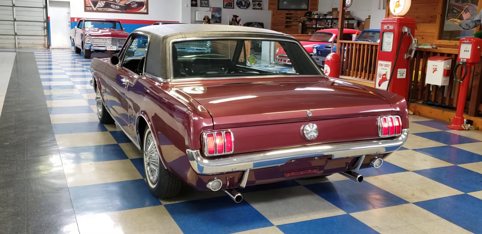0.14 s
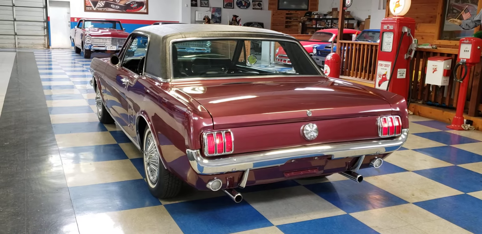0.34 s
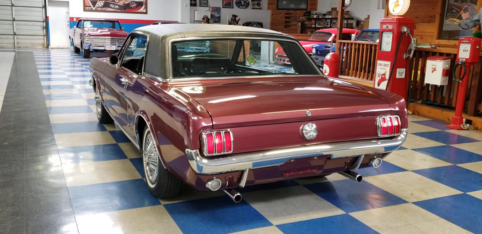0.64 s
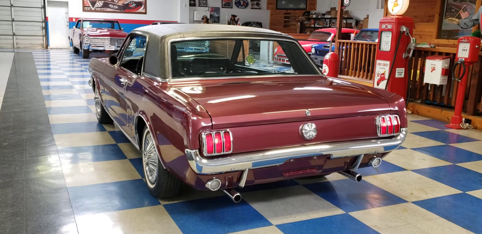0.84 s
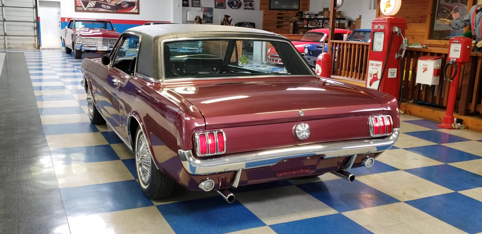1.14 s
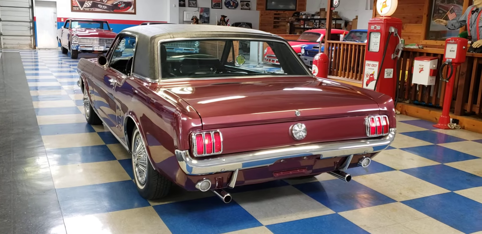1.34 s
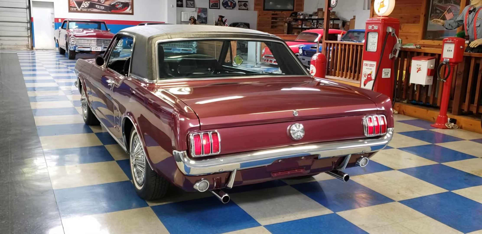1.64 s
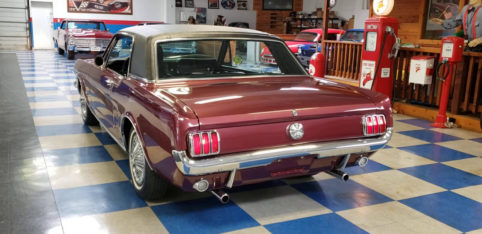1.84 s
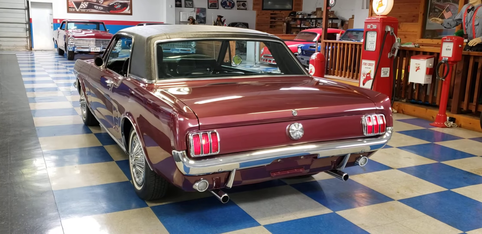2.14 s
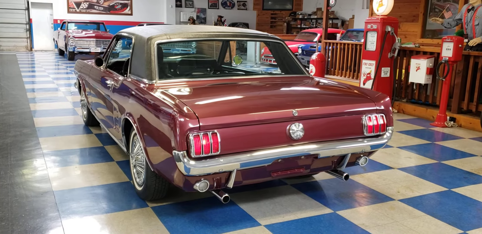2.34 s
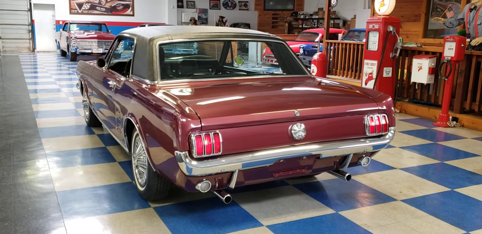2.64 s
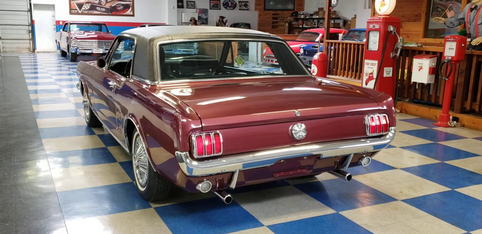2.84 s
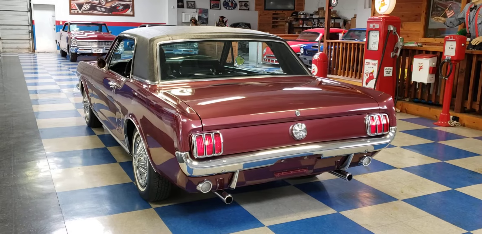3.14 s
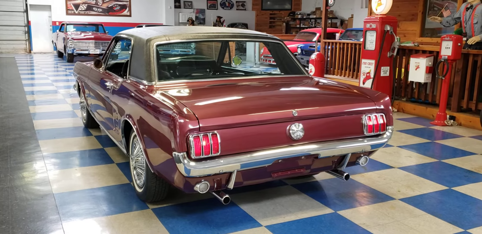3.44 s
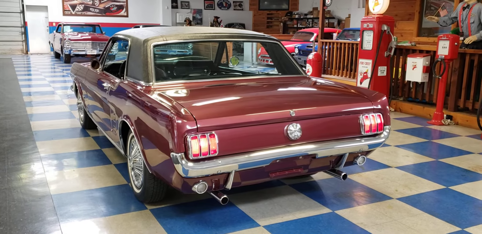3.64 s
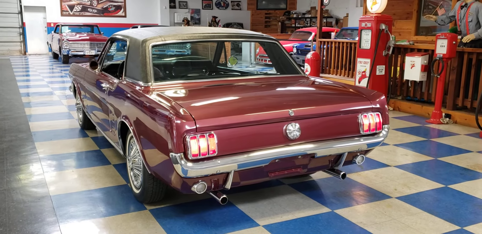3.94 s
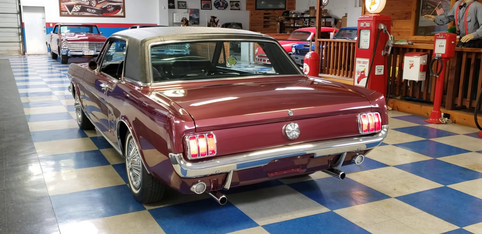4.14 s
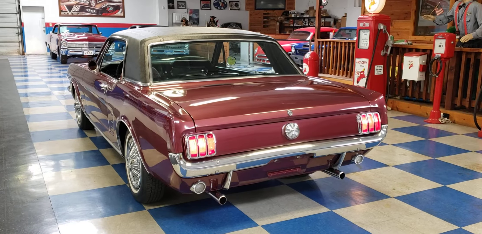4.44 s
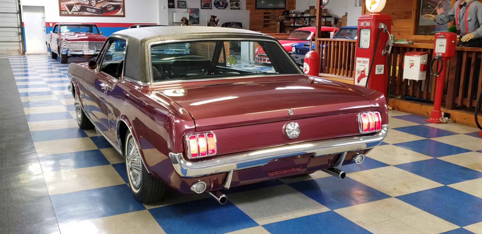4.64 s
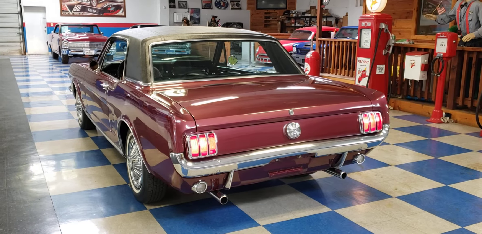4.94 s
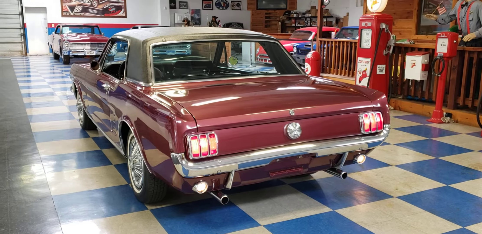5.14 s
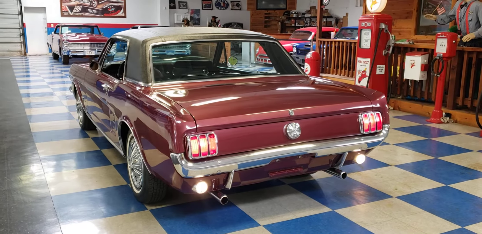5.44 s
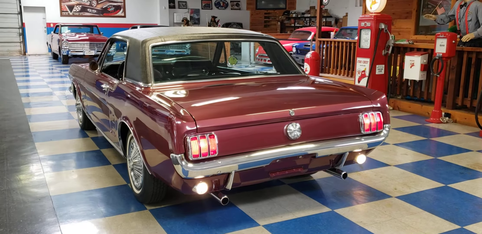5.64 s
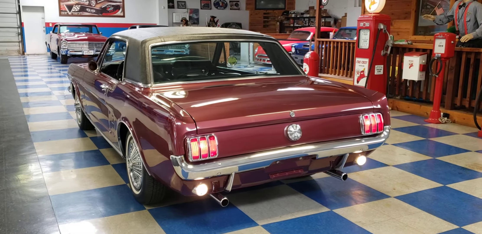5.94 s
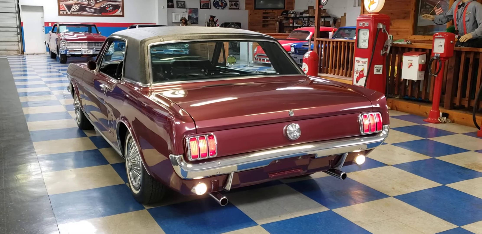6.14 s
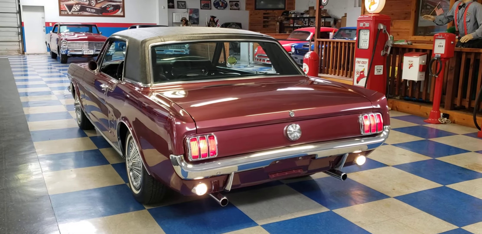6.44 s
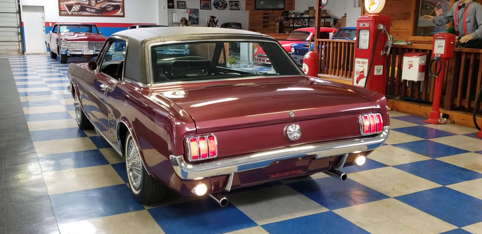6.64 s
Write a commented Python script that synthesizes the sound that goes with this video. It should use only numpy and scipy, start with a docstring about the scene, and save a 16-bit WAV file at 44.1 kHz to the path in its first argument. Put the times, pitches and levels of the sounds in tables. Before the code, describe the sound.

Uneven, deep V8 exhaust idle in a reverberant hall, two quick throttle blips, faint belt squeaks, brake hiss, and a metallic gear clack.

```python
"""The exhaust of an old V8 with twin tailpipes idles in a large tiled showroom, a few metres away.
Uneven firings ring pipes and muffler and blow noisy puffs; loose sheet metal chatters along.
Two blips of the throttle spin up the crankshaft, and the belt-driven fan, a band of noise, roars with it.
A belt squeaks faintly as a fluttering tone; with the brake held, a valve hisses as filtered noise.
Then a gear engages with a clack of short noise bursts, and its load drags the idle down."""
import sys
import numpy as np
from scipy import signal
from scipy.fft import rfft, irfft, next_fast_len
from scipy.io import wavfile

SR = 44100
rng = np.random.default_rng(int(sys.argv[2]) if len(sys.argv) > 2 else 0)


def transcribe(signal):
    """Save signal, clipped to [-1, 1], as a 16-bit WAV file at the path in sys.argv[1]."""
    frames = np.atleast_2d(signal).T
    limited = np.clip(frames, -1, 1)
    pcm = np.round(limited * 32767).astype(np.int16)
    wavfile.write(sys.argv[1], SR, pcm)


N = 299880
TIME = np.arange(N) / SR
SIZE = next_fast_len(N + 2 * SR)
FREQS = np.arange(SIZE // 2 + 1) * SR / SIZE + 1e-3  # the offset keeps the logarithm finite


def undb(db):
    """Amplitude gain is 10 to the power of the level in decibels over 20."""
    return 10 ** (np.asarray(db) / 20)


def unit(x):
    """Normalization: divide by the root mean square, so that it becomes 1."""
    return x / np.sqrt(np.mean(x ** 2))


def curves(rows):
    """Linear interpolation of each column of a timed table, at every sample."""
    s, *columns = np.transpose(rows)
    return [np.interp(TIME, s, c) for c in columns]


def ramp(start, length):
    """Linear onset: rise from 0 to 1 and stay there."""
    return np.clip((TIME - start) / length, 0, 1)


def shape(points):
    """Spectral envelope: levels interpolated over the logarithm of frequency, at every bin."""
    hz, db = np.transpose(points)
    return np.interp(np.log(FREQS), np.log(hz), db)


def colour(x, db):
    """Minimum-phase filter: folding the cepstrum gives a causal response with the gain of every bin."""
    cepstrum = irfft(np.log(undb(db)), SIZE)
    cepstrum[1:SIZE // 2] *= 2
    cepstrum[SIZE // 2 + 1:] = 0
    return irfft(rfft(x, SIZE) * np.exp(rfft(cepstrum)), SIZE)[..., :N]


def butter(x, hz, kind, order=2):
    """Butterworth low-, high- or band-pass: a maximally flat pass band."""
    sos = signal.butter(order, np.minimum(hz, .45 * SR), kind, fs=SR, output="sos")
    return signal.sosfilt(sos, x)


def walk(rate_hz):
    """Random fluctuation: white noise below a cutoff rate, with rms 1."""
    return unit(butter(rng.standard_normal(N), rate_hz, "low"))


def pan(db):
    """Level difference between the ears: gains of two channels for a left minus right level."""
    return undb(np.array([[db], [-db]]) / 2)


def aside(pair, points):
    """Frequency-dependent level difference: tilt each band of a stereo pair to its own side."""
    tilt_db = shape(points) / 2
    return np.array([colour(pair[0], tilt_db), colour(pair[1], -tilt_db)])


def showroom(x, wet_db):
    """Reverberation: direct sound plus an exponential tail, different at each ear; the treble dies first."""
    t60_s, treble_t60_s = 1.34, 1
    t = TIME[:SR]
    noise = rng.standard_normal((2, SR))
    low = butter(noise, 3100, "low", order=1)
    tail = low * undb(-60 * t / t60_s) + (noise - low) * undb(-60 * t / treble_t60_s)
    tail *= 1 - np.exp(-t / 0.002)
    tail *= undb(wet_db) / np.sqrt(np.sum(tail ** 2) / 2)
    wet = signal.fftconvolve(x[None], tail)[:, :N]
    return (x + wet) / np.sqrt(1 + undb(2 * wet_db))  # keeps the power


def crankshaft():
    """Rotational inertia: throttle drives a flywheel that friction runs down; gives firing rate and effort."""
    # idle with the throttle shut, dragged down by the gear: time_s, firing_rate_hz
    idle = [(0, 56.03), (.5, 54.97), (.85, 58.33), (2.0, 62.46), (3.6, 61.18), (4.25, 58.23), (4.85, 63.15),
            (5.3, 60.68), (5.57, 57), (5.69, 47.61), (5.92, 41.2), (6.15, 46.07), (6.4, 43.88),
            (6.8, 45.88)]
    # blips of the throttle: press_s, release_s, opening (0-1)
    blips = [(1.123, 1.384, .845), (2.053, 2.292, 0.96)]
    press_s, release_s = .13, .05  # travel times of the throttle
    push_hz_per_s, flywheel_s = 480, .5  # drive at full throttle; time constant of running down
    overrun_hz = 4.5  # scale above idle at which coasting sets in, with the throttle shut

    throttle = sum(opening * (ramp(press, press_s) - ramp(release, release_s))
                   for press, release, opening in blips)
    keep = np.exp(-1 / (flywheel_s * SR))
    revs = signal.lfilter([push_hz_per_s / SR], [1, -keep], throttle)
    coasting = np.tanh(revs / overrun_hz) * (1 - throttle)
    return curves(idle)[0] + revs, np.array([throttle, revs, coasting])


def drone(hz, firings, throttle):
    """Harmonic series: the even part of the firings; its overtones swell as they cross a resonance."""
    # the pipes favour some speeds: firing_rate_hz, firing_tone_db (throttle shut)
    tone = [(42, -26), (45, -23.5), (55, -26), (63, -26.5), (75, -34), (85, -31.5), (104, -27.5),
            (114, -23.5), (150, -20.5)]
    # octave of the firing tone: firing_rate_hz, level_db
    octave = [(41, -45), (46, -28.5), (51, -44), (55, -32), (58, -26), (63, -23.5), (70, -31.5),
              (79, -38.5), (95, -30.5), (112, -31), (150, -42)]
    # higher multiples of the firing rate: multiple, level_db (before the resonance gain)
    overtones = [(3, -37), (4, -30.5), (6, -36.5)]
    # resonances of the exhaust system: centre_hz, width_hz, gain_db
    booms = [(133.5, 13, -2), (184.5, 17.4, -1.5), (265.7, 12, -10.5), (493, 40, -24)]
    throttle_db = 6  # growth of the firing tone at full throttle

    tone_db = np.interp(hz, *np.transpose(tone)) + throttle_db * throttle
    octave_db = np.interp(hz, *np.transpose(octave))
    angle = 2 * np.pi * firings
    out = undb(tone_db + walk(12)) * np.sin(angle)
    out = out + undb(octave_db + walk(12)) * np.sin(2 * angle)
    for k, db in overtones:
        boom = sum(undb(gain_db) / (1 + 2j * (k * hz - centre) / width) for centre, width, gain_db in booms)
        out = out + undb(db + 2 * walk(7.6)) * np.imag(boom * np.exp(1j * k * angle))
    return np.sqrt(2) * out


def burble(pulses, effort, idle_db, chamber_hz=130, chamber_width_hz=240):
    """Impulse response and dispersion: uneven pulses ring the pipes; muffler chambers spread them in time."""
    # response of the pipes: frequency_hz, gain_db (relative)
    pipes = [(25, -73), (36, -11.5), (45, 3), (60, -3.5), (85, 3), (108, 3.5), (135, -0.5), (165, -5.5),
             (190, 2), (250, -11.5), (278, -2), (310, -24.5), (450, -32), (3000, -110)]
    # level against effort: full_throttle_db, db_per_hz above idle, coasting_db
    burble_law = (3, .07, .5)
    # crispness against effort: full_throttle_db, db_per_hz above idle, coasting_db
    crisp_law = (5.7, -0.087, 11.4)

    crisp_db = -1 + np.dot(crisp_law, effort)  # -1 dB at idle
    pole = np.exp((2j * chamber_hz - chamber_width_hz) * np.pi / SR)
    chamber = np.poly([pole, pole.conjugate()]).real
    spread = signal.lfilter(chamber[::-1], chamber, colour(pulses, shape(pipes)))  # all-pass
    ring = showroom(spread, -10)[0]
    # low-pass forwards and backwards, so that the low part keeps its phase
    low = butter(butter(ring, 160, "low")[::-1], 160, "low")[::-1]
    mix = (low + undb(crisp_db) * (ring - low)) / np.sqrt(1 + 0.68 * undb(2 * crisp_db))
    lumps = unit(mix) * undb(idle_db + np.dot(burble_law, effort))
    return showroom(lumps, -18.5)


def woofs(hz=52, length=0.036):
    """Tone burst: a late burn in the pipes, just after the throttle shuts, gives two or three slow cycles."""
    # bursts: centre_s, level_db
    bursts = [(1.455, -15.5), (1.57, -25), (2.524, -26)]
    out = 0
    for s, db in bursts:
        age = TIME - s
        out = out + undb(db) * np.exp(-(age / length) ** 2) * np.sin(2 * np.pi * hz * age)
    return out


def stumbles(length=0.017):
    """Amplitude modulation: weak firings leave short gaps in the exhaust note; this is its gain."""
    # gaps: centre_s, depth_db
    gaps = [(0.223, -8), (.32, -11), (.485, -5), (1.645, -7), (1.895, -3.5), (3.04, -3), (4.2, -11.5),
            (5.23, -1)]
    return undb(sum(db * np.exp(-((TIME - s) / length) ** 2) for s, db in gaps))


def gas(firings, excess, pulses, effort, idle_rasp_db, bank_db=1.9):
    """Turbulent jet noise: each firing rings the muffler and blows a puff of gas out of the tailpipe."""
    # responses of muffler and tailpipe: frequency_hz, gain_db (relative)
    muffler = [(150, -26.5), (300, 1.5), (355, 0.5), (410, -3.5), (478, 3), (550, -4), (650, -3),
               (770, -24.5), (1200, -27), (5000, -57)]
    tailpipe = [(400, -22.5), (780, -7.5), (1050, 5.5), (1260, -10), (1480, 0.5), (1850, -5.5), (2400, -8),
                (3800, -9), (4700, -9), (6200, -16), (7600, -34), (10000, -27), (12500, -21.5),
                (15500, -21.5)]
    # side on which each band of the puff is heard: frequency_hz, left_minus_right_db
    tailpipe_pan = [(1200, 3), (2500, 10), (4000, 4), (5000, -3), (6000, -9), (10000, -10), (15000, -2)]
    # rasp and puff against effort: full_throttle_db, db_per_hz above idle, coasting_db
    rasp_law = (4.6, 0.11, -1.2)
    puff_law = (7.6, .14, -7)

    rasp_db = idle_rasp_db + np.dot(rasp_law, effort)
    puff_db = -47 + np.dot(puff_law, effort)  # -47 dB at idle
    # the flow leaps at each firing and dies away before the next
    gate = unit(.3 + undb(bank_db * excess) * np.exp(-(firings % 1) / .4))
    rasp_source = gate * rng.standard_normal(N) + unit(pulses)
    rasp = unit(colour(rasp_source, shape(muffler))) * undb(rasp_db)
    puff = unit(colour(gate * rng.standard_normal(N), shape(tailpipe))) * undb(puff_db)
    rasp_pair = showroom(showroom(rasp, -2.5)[0], -16.5) * pan(2.4)
    return rasp_pair + aside(showroom(puff, 1.1), tailpipe_pan)


def exhaust(hz, effort, firings, count):
    """Superposition of even and uneven firings; the bass reaches both ears nearly alike."""
    # unevenness of the burn: time_s, burble_db (at idle), scatter (share of a firing), rasp_db (at idle)
    lumpy = [(0, -26.5, 0.57, -42), (.4, -26.5, 0.66, -45.5), (1.1, -27.5, 0.63, -41.5),
             (1.6, -27, 0.55, -43), (2.3, -29.5, 0.69, -43), (3.4, -28, .45, -41), (3.95, -32.5, 0.52, -42),
             (5.0, -31, 0.51, -40), (5.6, -27, .5, -39.5), (5.9, -37, 0.54, -49), (6.15, -32, 0.41, -43),
             (6.8, -35, 0.42, -46.5)]
    # in firing order: excess (of each cylinder's pulse over the mean; the sign tells its bank)
    cylinders = [0.68, -1.1, 0.57, 0.79, -0.34, 0.52, -0.55, -0.78]

    burble_db, scatter, rasp_db = curves(lumpy)
    # the banks fire out of step, so each pulse is over or under the mean
    chance = rng.standard_normal(N)[count]  # one draw for each firing
    excess = np.array(cylinders)[count % len(cylinders)] + scatter * chance
    pulses = np.diff(count, prepend=0) * excess / np.sqrt(hz)
    note = drone(hz, firings, effort[0]) + burble(pulses, effort, burble_db) + woofs()
    return note * stumbles() * pan(1.3) + gas(firings, excess, pulses, effort, rasp_db)


def chatter(count, hz, effort, scatter_db=3, bout_db=6.5):
    """Impact excitation of modes: firings jolt loose sheet metal in bouts; slow ones jolt hardest."""
    # modes of the sheet metal on the exhaust: centre_hz, width_hz, gain_db
    shield = [(1052, 103, -9), (1468, 138, 3.5), (1574, 55, 5.5), (1700, 36, -1.5)]
    # chatter against effort: full_throttle_db, db_per_hz above idle, coasting_db
    chatter_law = (10.3, 0.12, -7)

    level_db = -52 + np.dot(chatter_law, effort)  # -52 dB at idle
    jolt_db = scatter_db * rng.uniform(-1.7, 1.7, N) + bout_db * np.tanh(walk(18))
    jolts = np.diff(count, prepend=0) / hz * undb(jolt_db)
    decay = np.exp(-1 / (0.0049 * SR))  # contact dies away in 4.9 ms
    contact = signal.lfilter([1], [1, -decay], jolts) * rng.standard_normal(N)
    ring = sum(undb(gain_db) * butter(contact, [f - width / 2, f + width / 2], "band")
               for f, width, gain_db in shield)
    return showroom(unit(ring) * undb(level_db), -6) * pan(5)


def gear():
    """Impact noise: steel drive-line parts scrape and snap together, then the axle settles with duller knocks."""
    # the slack is taken up: start_s, peak_db (before the colour), decay_s, low_edge_hz, high_edge_hz
    knocks = [(5.505, -35, 0.09, 901, 8000), (5.573, -34, 0.0166, 4000, 7000),
              (5.58, -20, 0.0083, 3180, 6900), (5.5838, -7.5, 0.0027, 4080, 5270),
              (5.585, -15, 0.0011, 1500, 15000), (5.5896, -14, 0.0058, 300, 14000),
              (5.61, -25, 0.016, 400, 7500), (5.625, -21.5, 0.0067, 300, 1100),
              (5.639, -19.5, 0.0058, 300, 700)]
    # response of the steel parts: frequency_hz, gain_db
    clack = [(200, -6), (500, -6), (1000, -5), (2100, 0), (2800, 0.5), (4400, -6), (5300, -2), (6600, -4.5),
             (7900, -21), (11500, -16), (15500, -21)]
    out = 0
    for start, db, decay, low_hz, high_hz in knocks:
        age = np.maximum(TIME - start, 0)
        envelope = undb(db) * (age > 0) * np.exp(-age / decay)
        out = out + envelope * unit(butter(rng.standard_normal(N), [low_hz, high_hz], "band"))
    return showroom(colour(out, shape(clack)), -1.46) * pan(7.4)


def fan(hz, firings, idle_db=-47, db_per_decade=37, chop=0.1):
    """Aerodynamic noise grows with a power of speed; the blades of the belt-driven fan chop it lightly."""
    # spectrum of the fan: frequency_hz, level_db (relative)
    fan_colour = [(200, -11.5), (390, -13), (540, 3.5), (1300, 4), (1900, 1.5), (2450, -2.5), (3300, -0.5),
                  (4200, -4), (5200, -7), (7000, -21), (9000, -33), (13000, -28), (15500, -12)]
    # side on which each band is heard, after its way round the car: frequency_hz, left_minus_right_db
    fan_pan = [(300, 5.5), (1200, 2.5), (2200, 7.5), (3300, 9), (4200, 2.5), (5000, -1.5), (6500, -6),
               (9000, -5), (15000, 2)]
    air = unit(colour(rng.standard_normal(N), shape(fan_colour)))
    air = air * (1 + chop * np.sin(2 * np.pi * firings))
    level_db = idle_db + db_per_decade * np.log10(hz / 60) + .5 * walk(16)
    return aside(showroom(air * undb(level_db), 4.2), fan_pan)


def hiss(spray_db=-14):
    """Flow noise: brake vacuum draws air through a narrow valve; it brightens as the pedal sinks."""
    brake_at_s, onset_s = 3.56, 0.1
    sunk = ramp(4.314, 0.61)  # start and length of the sinking, in s
    level_db = np.interp(sunk, [0, 1], [-52.5, -50])
    edge_hz = np.interp(sunk, [0, 1], [5860, 6670])
    out = 0
    for hz in np.geomspace(3700, 8000, 9):
        band = unit(butter(rng.standard_normal(N), [hz / 1.05, hz * 1.05], "band"))
        out = out + band * undb(1.5 * walk(36)) / np.sqrt(1 + (hz / edge_hz) ** 24)
    spray = unit(butter(rng.standard_normal(N), [9800, 15000], "band"))
    air = (unit(out) + undb(spray_db) * spray) * undb(level_db)
    return showroom(air * ramp(brake_at_s, onset_s), 19) * pan(9.3)


def belt():
    """Stick-slip friction: the belt slips now and then and sings a thin note with random flutter."""
    # squeaks: start_s, length_s, pitch_hz (mean), level_db
    squeaks = [(-.05, 0.23, 3344, -50.5), (0.805, .42, 3310, -50), (1.287, 0.093, 4670, -40)]
    out = 0
    for start, length, hz, db in squeaks:
        swell = np.sqrt(np.abs(np.sin(np.pi * ramp(start, length))))
        cycles = np.cumsum(hz * (1 + 0.0151 * walk(157))) / SR
        out = out + swell * undb(db + 3.6 * walk(32)) * np.sin(2 * np.pi * cycles)
    return showroom(out, -7) * pan(7)


def scene():
    """Common drive: one crankshaft phase times the exhaust, the chatter and the fan."""
    hz, effort = crankshaft()
    firings = np.cumsum(hz) / SR
    count = firings.astype(int)
    engine = exhaust(hz, effort, firings, count) + chatter(count, hz, effort) + gear()
    return engine + fan(hz, firings) + hiss() + belt()


def record(dry, hiss_db=-65):
    """Self-noise and band limit: each microphone adds faint high hiss; an elliptic low-pass cuts the top."""
    # spectrum of the microphone hiss: frequency_hz, level_db (relative)
    mic_hiss = [(8000, -11), (12000, 3), (13700, -12), (15200, -1), (16500, -10), (18000, -30)]
    top_hz = 15800
    noise = unit(colour(rng.standard_normal(dry.shape), shape(mic_hiss))) * undb(hiss_db)
    low_pass = signal.ellip(10, .2, 80, top_hz, fs=SR, output="sos")
    return signal.sosfilt(low_pass, dry + noise)


dry = scene()
out = record(dry)
transcribe(out)
```